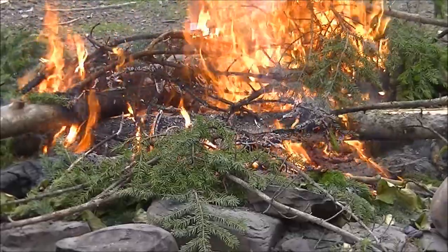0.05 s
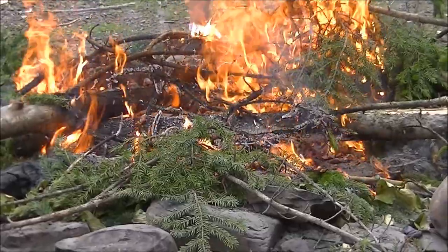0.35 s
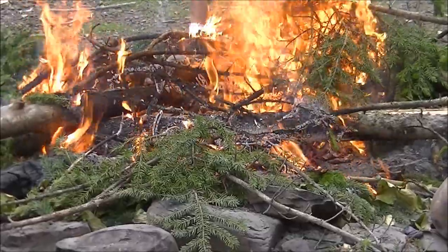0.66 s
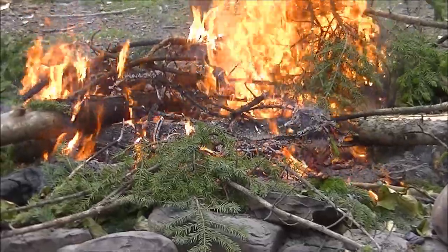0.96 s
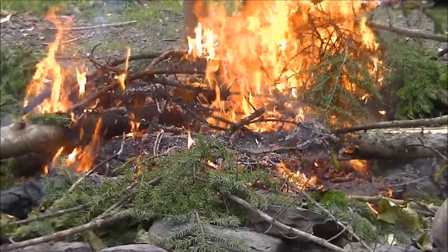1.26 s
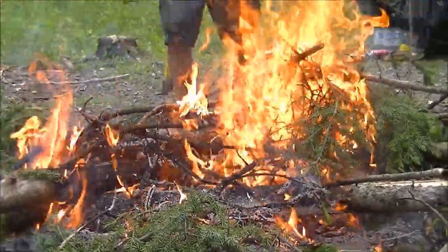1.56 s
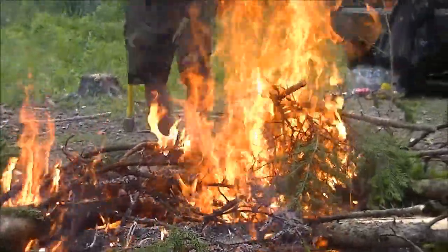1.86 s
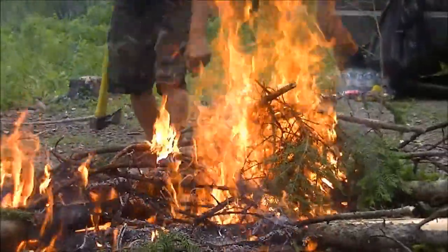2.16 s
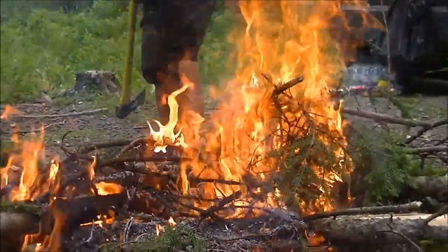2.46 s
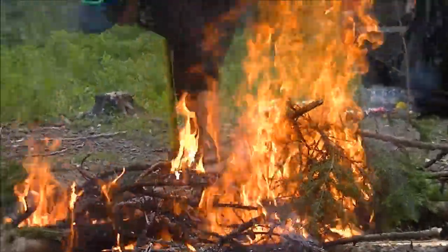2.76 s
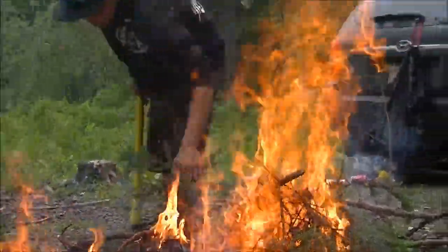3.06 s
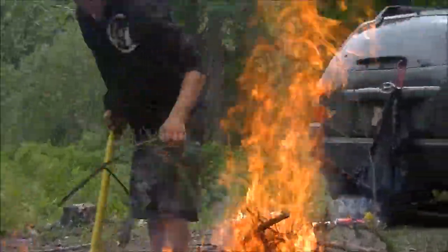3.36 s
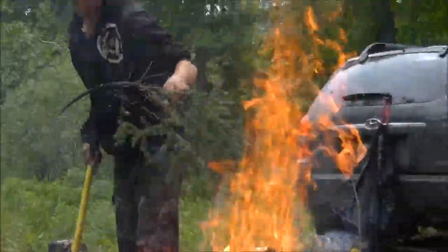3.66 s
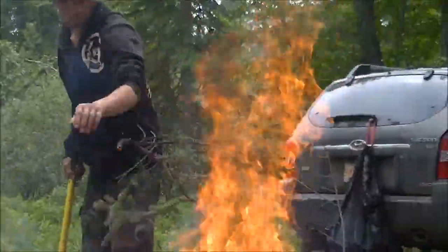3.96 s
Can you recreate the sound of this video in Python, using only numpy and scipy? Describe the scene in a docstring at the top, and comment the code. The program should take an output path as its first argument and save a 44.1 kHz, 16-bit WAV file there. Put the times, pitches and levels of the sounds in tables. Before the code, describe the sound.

A brush fire of conifer branches crackles close by outdoors for the whole four seconds. Sharp, bright pops scatter irregularly, with the loudest snaps at about 0.3, 0.7, 1.8, 2.0 and 3.6 seconds. Between them, burning needles tick and sizzle over a soft, steady hiss. A low rumble and rush of flames runs underneath, swelling slightly around 3.8 seconds.

```python
"""Conifer branches burning in the open

Pockets of sap and steam burst in the twigs as sharp pops that scatter through the pile.
Some pops make the wood ring. Between them, burning needles tick and sizzle, over a hiss of steam
and the low rumble of the flames. The fire is close, and sounds almost the same in both ears."""
import sys
import numpy as np
from scipy import signal
from scipy.fft import rfft, irfft
from scipy.io import wavfile

SR = 44100
rng = np.random.default_rng(int(sys.argv[2]) if len(sys.argv) > 2 else 0)


def digitize_waveform(pressure):
    """Quantize a signal to 16-bit integers and store it at the path in sys.argv[1].

    Rows of a 2-D input are taken as channels; values are limited to [-1, 1].
    """
    field = np.atleast_2d(pressure).T
    bounded = np.clip(field, -1, 1)
    quanta = np.round(bounded * 32767).astype(np.int16)
    wavfile.write(sys.argv[1], SR, quanta)


N = 176400
BURST_SAMPLES = 2048
TICK_HZ = 8700  # the typical pitch of a needle tick

# How strongly the needles and steam sizzle. Each row: time in seconds, level in dB.
SIZZLE = [(0, -60), (.35, -58), (.65, -60), (.9, -57.5), (1.15, -59), (1.5, -58), (1.8, -60), (2.1, -61),
          (2.4, -58.5), (2.75, -61.5), (3.15, -58.5), (3.5, -58), (4, -57)]


def pops():
    """Pockets of sap and steam burst in twigs and bark; a few leave the wood ringing briefly."""
    # Each row: start in seconds, level in dB, pitch in Hz, sharpness of that pitch (Q),
    # level of the wood's knock in dB compared with the crack.
    pockets = [(0.0162, -38, 10500, 0.5, -21), (0.0492, -43.5, 7700, 0.57, -18),
               (0.0655, -39.5, 9900, 1.6, -12), (0.0857, -41.5, 11200, 2.5, -25),
               (0.1348, -40.5, 5300, 0.55, -3), (0.1493, -31.5, 14000, 0.47, -27),
               (0.191, -33, 9600, 1.5, -8.5), (0.2274, -36, 8200, 1.9, -2), (0.2321, -30, 11500, 1.3, -14),
               (0.2374, -43, 6200, 1.4, -7), (0.259, -39, 12000, 1.5, -12), (0.2973, -23, 5230, 2.3, -18.5),
               (0.3, -40, 9900, 2.6, -11), (0.3226, -47, 8000, 1.5, -21), (0.3291, -33.5, 8700, 0.81, -27),
               (0.3364, -43.5, 7000, 0.6, -22), (0.38, -35.5, 8500, 1, -18), (0.3831, -33, 14000, 1.2, -4),
               (0.3981, -37.0, 9600, 1.9, -28), (0.437, -42.5, 4800, 0.41, 1), (0.4395, -44, 8000, 1, -10),
               (0.5121, -38, 9600, 1.1, -23), (0.522, -40.5, 13900, 0.64, -21),
               (0.5249, -38.5, 8200, 0.8, -11), (0.5633, -39, 10900, 3.0, -14),
               (0.5664, -33.0, 8000, 1.3, -30), (0.5993, -27.5, 13000, 0.7, -6.5),
               (0.6547, -30, 10200, 1.4, -28), (0.657, -26, 11600, 2.2, -26),
               (0.6844, -27.5, 8800, 0.65, -20), (0.6986, -42.0, 14000, 1.1, -18),
               (0.7866, -38.5, 8540, 0.7, -26), (0.7932, -44, 9000, 1, -17), (0.8026, -35, 11200, 1.1, -17),
               (0.8343, -41.5, 10500, 2.5, -8), (0.8762, -43, 6000, 1.4, 2), (0.93, -43, 8500, 1.7, -10),
               (0.9567, -47, 8450, 1.3, -14), (0.9952, -39, 12000, 2.2, -9),
               (0.9999, -42.5, 9000, 0.76, -9), (1.0284, -35.5, 2980, 0.88, -2),
               (1.0326, -42, 7500, 1, -11), (1.046, -37, 7700, 1.7, -2), (1.0545, -32.5, 7000, 1.1, -4.5),
               (1.0587, -31.5, 9300, 0.97, -24), (1.1702, -34, 9500, 0.55, -19),
               (1.2223, -47, 10000, 1.6, -12), (1.2527, -38, 8000, 0.58, -27),
               (1.2777, -37.5, 10900, 0.72, -13), (1.288, -39, 7700, 3.2, -13),
               (1.2935, -41.5, 6800, 0.7, -17), (1.3093, -38.5, 14000, 0.4, -3),
               (1.3359, -42, 9600, 0.97, -9), (1.4036, -40.5, 7200, 2, -6), (1.4536, -42.5, 9500, 1.5, -14),
               (1.48, -39.5, 14000, 0.9, -24), (1.4863, -44, 9500, 1.4, -20), (1.496, -29, 5130, 1.1, -31),
               (1.513, -36, 8700, 0.79, -25), (1.5231, -36.0, 5600, 1.4, -23),
               (1.527, -43, 10000, 1.8, -18), (1.5493, -31.5, 3360, 2, -20),
               (1.5594, -36.5, 8440, 4.1, -19), (1.5822, -43.5, 9900, 0.91, -8),
               (1.6356, -47, 9600, 3.5, -16), (1.6457, -43, 6000, 0.66, -7), (1.6872, -41, 10900, 2.2, -10),
               (1.7046, -34.5, 5730, 0.9, -14), (1.764, -23, 8000, 0.99, -15),
               (1.776, -41, 12900, 0.55, -12), (1.8627, -36, 8500, 1.1, -10.5),
               (1.8748, -29.5, 11200, 1.6, -17), (1.914, -24.5, 8900, 1.7, -22),
               (1.917, -38, 14000, 0.8, -24), (1.9687, -47, 7000, 0.8, -12), (1.9722, -22, 9700, 0.84, -24),
               (1.9864, -40.5, 9000, 0.66, -19), (2.012, -39, 8000, 1.3, -19),
               (2.0258, -39.5, 10500, 0.6, -24), (2.1384, -30.5, 9800, 1.1, -16.5),
               (2.1937, -34.5, 14000, 0.39, -16), (2.1957, -34, 10300, 4.9, -28),
               (2.205, -39.5, 10500, 3.5, -14), (2.2269, -39, 8040, 2.3, -24),
               (2.2403, -38.5, 6000, 0.67, -23), (2.2751, -43, 6950, 1.5, -19),
               (2.2775, -33, 6260, 0.9, -24), (2.3248, -29, 5950, 0.54, -24),
               (2.4367, -37.5, 12000, 1.8, -11), (2.476, -35.5, 10600, 2, -4), (2.522, -45, 9400, 1.1, -5),
               (2.549, -37.5, 7460, 1.1, -26), (2.6242, -34, 7500, 1.4, -25), (2.6304, -38.5, 7900, 2, -11),
               (2.6659, -41, 8700, 1.6, -30), (2.7175, -33.5, 8440, 0.51, -24),
               (2.7392, -39, 7200, 0.44, -23), (2.7945, -40, 11200, 1.6, -7.5),
               (2.8501, -34, 5500, 0.38, -3.5), (2.8591, -30.0, 9000, 2.4, -32),
               (2.8832, -33.5, 9300, 1.1, -27), (2.9235, -30, 8100, 2, -14.5),
               (2.9245, -32, 9500, 2.2, -28), (2.9507, -34.5, 9300, 2.6, -12),
               (3.005, -38.5, 8740, 1.6, -22), (3.0192, -48, 6300, 1.2, -14), (3.03, -42.5, 7700, 1.2, -10),
               (3.069, -43, 8700, 0.77, 1), (3.0886, -42.5, 7200, 1.3, -6), (3.0943, -44, 5000, 1.1, -22),
               (3.1759, -40, 8300, 1.1, -16), (3.227, -37.5, 8460, 1.6, -8.5),
               (3.236, -44, 14000, 0.76, -15), (3.2463, -46.5, 8500, 1.5, -14),
               (3.301, -44, 12300, 1.6, -5), (3.316, -40, 8200, 1.3, -5), (3.321, -41, 7500, 2.6, -6),
               (3.3516, -35.5, 8500, 2.3, -10.5), (3.3836, -43, 6800, 0.8, -25),
               (3.3883, -42.5, 10200, 2.8, -15), (3.43, -43.5, 8500, 1, -6), (3.451, -49, 9000, 1.4, -11),
               (3.5266, -43.0, 7200, 1.1, -2), (3.566, -27, 7500, 1.4, -22), (3.596, -44, 10200, 1.1, -9),
               (3.6162, -31.5, 9200, 1.4, -8.5), (3.6197, -40, 14000, 1.1, 1),
               (3.6246, -39, 10500, 3.0, -1), (3.6482, -23, 6800, 1.2, -19), (3.6785, -40, 8200, 1.5, -8),
               (3.7897, -27, 10100, 1.6, -12), (3.7912, -32, 10100, 2, -27), (3.7936, -33.5, 8500, 0.7, -8),
               (3.8087, -42, 9000, 2, -18), (3.853, -43.5, 5470, 0.63, 4), (3.8628, -40.5, 8200, 3.2, -24),
               (3.889, -42.5, 14000, 1.9, -7), (3.9412, -42.5, 8600, 1.2, -8), (3.9453, -41, 6760, 1.4, 8),
               (3.9554, -54, 7500, 0.9, -8), (3.9719, -36, 5600, 0.31, -7), (3.9801, -42, 3000, 2.2, -10)]
    # Ringing twigs. Each row: start in seconds, peak level in dB, pitch in Hz, swell time in seconds.
    twig_rings = [(0.2974, -37.5, 960, 0.00067), (0.2975, -28.5, 4220, 0.00023),
                  (0.2975, -18.5, 10600, 0.00015), (0.5994, -39.5, 1040, 0.00068),
                  (1.4961, -37, 10000, 0.00032), (1.5493, -34, 5400, .0003), (1.9722, -37.5, 960, 0.00046),
                  (3.7901, -34.5, 3980, 0.00083)]
    out = np.zeros(N)
    t = np.arange(BURST_SAMPLES) / SR
    for start, db, pitch_hz, sharpness, knock_db in pockets:
        add(out, start, amp(db + 0.21) * burst(pitch_hz, sharpness, knock_db))
    for start, db, pitch_hz, swell_s in twig_rings:
        swell_and_fade = t / swell_s * np.exp(1 - t / swell_s)
        add(out, start, amp(db) * swell_and_fade * np.sin(2 * np.pi * pitch_hz * t))
    return out


def burst(pitch_hz, sharpness, knock_db, tails_db=0):
    """One pocket bursts: a crack and a knock of wood, followed by splinters and echoes."""
    # The tone that all bursts share. Each row: frequency in Hz, gain in dB.
    burst_tone = [(100, -31), (500, -3), (900, 0), (1400, -3), (2600, 1), (3700, -2.5), (5000, -0.5),
                  (11000, 0.5), (13000, -1.5), (16000, 0)]
    hz = np.fft.rfftfreq(BURST_SAMPLES, 1 / SR) + 1
    # Big, low pockets burst more slowly, so they lose their treble.
    cutoff_hz = 12660 * (pitch_hz / TICK_HZ) ** 0.19
    tone = amp(db_at(burst_tone, hz)) / np.hypot(1, (hz / cutoff_hz) ** 6.1)
    crack = resonate(tone, hz, pitch_hz, sharpness)
    knock = amp(knock_db) * resonate(tone, hz, pitch_hz=1480, sharpness=0.68)
    # Pack the energy at the very start, as in a real click ("minimum phase").
    log_gain = np.log(np.hypot(crack, knock) + 1e-4)
    mirrored = np.r_[log_gain, log_gain[-2:0:-1]]
    click_spectrum = np.exp(np.conj(signal.hilbert(mirrored))[:len(hz)])
    splinters = tail(db=-6, fade_s=0.0037)  # fibres tear just after the burst
    scatter = tail(db=-8, fade_s=0.023)  # off the pile and its ring of stones
    clearing = tail(db=-22.5, fade_s=0.11)  # a faint echo from the clearing
    paths = amp(tails_db) * (splinters + scatter + clearing)
    paths[0] = 1  # the direct sound
    sound = irfft(click_spectrum * rfft(paths))
    return sound / np.linalg.norm(sound) * np.sqrt(SR / 1000)  # as much energy as 1 ms at level one


def needles(kinds=40, ticks_per_s=135):
    """Burning needles tick at many pitches, in clumps that thicken when the sizzle is strong."""
    clumping = np.exp(0.25 * drift(rate_hz=13))
    rate = ticks_per_s * unit(amp(level_curve(SIZZLE)) * clumping)
    tick_db = -56.5 + rng.exponential(6.5, N) % 12  # mostly faint, some up to 12 dB louder
    clicks = (rng.random(N) < rate / SR) * amp(tick_db) * rng.choice([-1, 1], N)
    kind = rng.integers(0, kinds, N)
    ticks = [burst(TICK_HZ * 2 ** (0.39 * pitch), sharpness=3.4 * np.exp(0.5 * sharp),
                   knock_db=-8.5 + 4 * knock, tails_db=-4)
             for pitch, sharp, knock in rng.standard_normal((kinds, 3))]
    out = np.zeros(N)
    for i in np.flatnonzero(clicks):
        add(out, i / SR, clicks[i] * ticks[kind[i]])
    return out


def flames():
    """The swirling gas of the flames makes a low rumble and a higher rush."""
    # The strength of the flames. Each row: time in seconds, rumble level in dB, rush level in dB.
    blaze = [(0, -57.5, -62), (.4, -57, -61), (1.4, -56, -59.5), (1.8, -58, -61.5), (2.7, -57, -62),
             (3.5, -55.5, -59.5), (3.77, -53, -57.5), (3.87, -51, -56.5), (4, -55, -56.5)]
    # The tone of each sound. Each row: frequency in Hz, relative level in dB.
    rumble_tone = [(20, -16), (32, -21), (50, -10), (85, -4), (130, -0.5), (165, -2.5), (205, -1.5),
                   (285, -2.5), (325, -11), (600, -34.5), (2000, -86)]
    rush_tone = [(100, -41), (350, 4.5), (500, 5), (800, 2), (1050, 2), (1350, -1.5), (1900, -2.5),
                 (3200, -8.5), (3750, -18.5), (6000, -21), (16000, -45)]
    rumble = gas(rumble_tone, level_curve(blaze, column=1), flutter_db=0.57, flutter_hz=7.8)
    rush = gas(rush_tone, level_curve(blaze, column=2) + 1, flutter_db=1.34, flutter_hz=26)
    return rumble + rush


def steam():
    """Escaping steam hisses, rising and falling with the sizzle."""
    # Each row: frequency in Hz, relative level in dB.
    hiss_tone = [(500, -50), (3600, 0.5), (4500, 0.5), (7000, 1), (10300, 1), (12200, -3), (14000, -7.5),
                 (15800, -8), (16400, -29)]
    return gas(hiss_tone, level_curve(SIZZLE) - 4.5, flutter_db=1.5, flutter_hz=60)


def gas(tone, level_db, flutter_db, flutter_hz, width_db=-30):
    """Swirling gas: shaped noise whose level flutters, with a trace of stereo width."""
    gain = amp(db_at(tone, np.fft.rfftfreq(N, 1 / SR)))
    middle, side = irfft(rfft(rng.standard_normal((2, N))) * gain, N)
    noise = middle + amp(width_db) * np.array([side, -side])
    flutter = amp(flutter_db * drift(flutter_hz))
    return amp(level_db) * unit(noise * flutter)


def resonate(tone, hz, pitch_hz, sharpness):
    """Favours the frequencies near one pitch; more sharpness makes the peak narrower."""
    return unit(tone / np.hypot(1, sharpness * (hz / pitch_hz - pitch_hz / hz)))


def tail(db, fade_s):
    """A spray of tiny random echoes that dies away by 60 dB in fade_s seconds."""
    t = np.arange(BURST_SAMPLES) / SR
    echoes = rng.standard_normal(BURST_SAMPLES) * np.exp(-np.log(1000) * t / fade_s) * (t > 0)
    return amp(db) * echoes / np.linalg.norm(echoes)


def drift(rate_hz):
    """Random wandering around zero, mostly slower than rate_hz, with a typical size of one."""
    hz = np.fft.rfftfreq(N, 1 / SR)
    spectrum = rfft(rng.standard_normal(N)) * (hz > 0) / (1 + (hz / rate_hz) ** 2)
    return unit(irfft(spectrum, N))


def level_curve(table, column=1):
    """Joins a table's levels with straight lines, giving dB at every sample."""
    rows = np.array(table)
    return np.interp(np.arange(N) / SR, rows[:, 0], rows[:, column])


def db_at(table, hz):
    """Looks up dB at any frequency, joining the table's rows on a musical (log) scale."""
    row_hz, row_db = np.transpose(table)
    return np.interp(np.log(hz + 1), np.log(row_hz), row_db)


def add(mix, start_s, sound):
    """Adds a sound to the mix at the given time."""
    part = mix[max(round(start_s * SR), 0):][:len(sound)]
    part += sound[:len(part)]


def amp(db):
    """Turns decibels into a number to multiply by."""
    return 10 ** (np.asarray(db) / 20)


def unit(x):
    """Scales a signal to an average (rms) level of one."""
    return x / np.sqrt(np.mean(x ** 2) + 1e-20)


def scene():
    """The fire, straight ahead in the open air."""
    return pops() + needles() + flames() + steam()


def record(dry, phase_gap_rad=0.087, top_hz=16400):
    """The microphone's two openings are slightly unequal, and the highest treble is cut off."""
    # Each row: frequency in Hz, left level minus right level in dB.
    balance = [(100, -.9), (500, -.7), (1200, -.2), (8000, 0)]
    lean_db = db_at(balance, np.fft.rfftfreq(N, 1 / SR)) / 2
    phase_shift = np.exp(0.5j * phase_gap_rad * np.array([[1], [-1]]))
    heard = irfft(rfft(dry) * amp([lean_db, -lean_db]) * phase_shift, N)
    treble_cut = signal.firwin(255, top_hz, window=("kaiser", 9), fs=SR)
    return signal.oaconvolve(heard, treble_cut[None], "same")


dry = scene()
out = record(dry)
digitize_waveform(out)
```